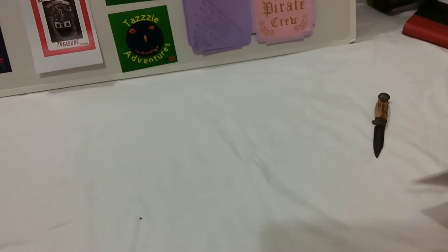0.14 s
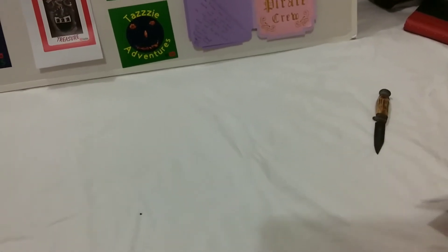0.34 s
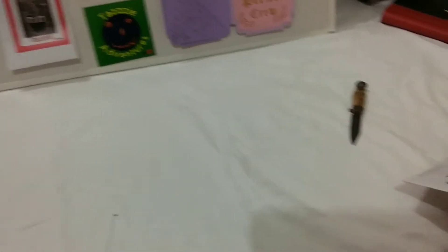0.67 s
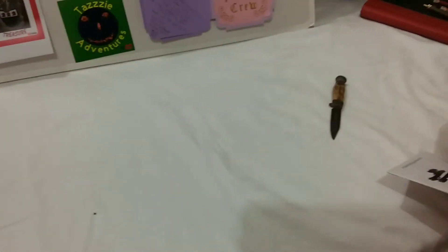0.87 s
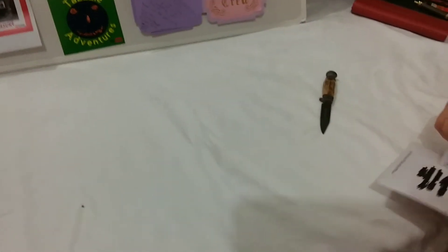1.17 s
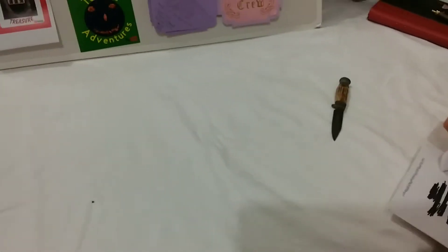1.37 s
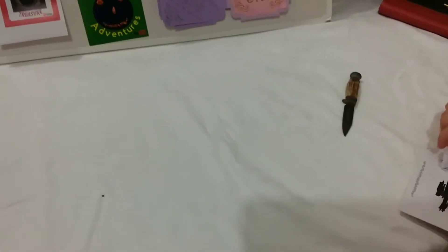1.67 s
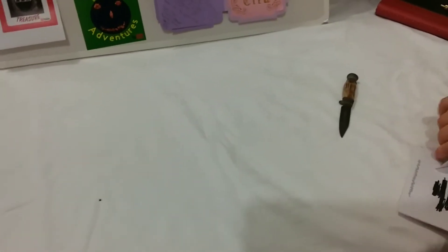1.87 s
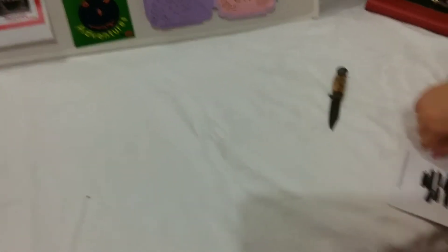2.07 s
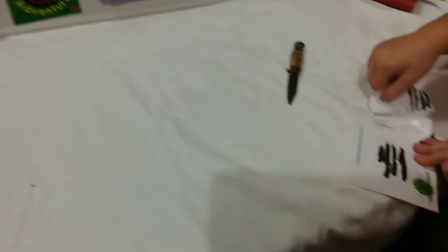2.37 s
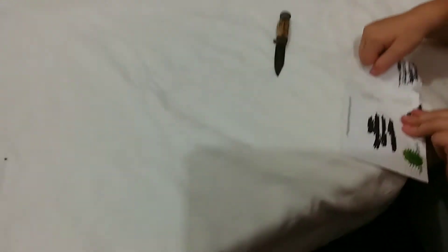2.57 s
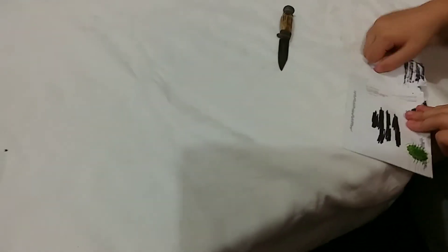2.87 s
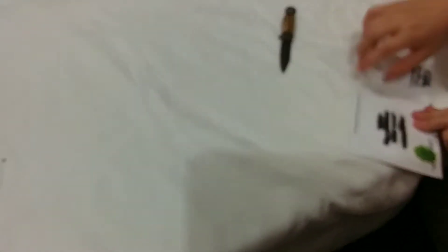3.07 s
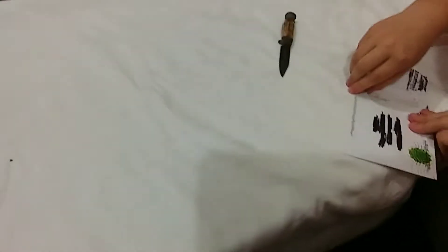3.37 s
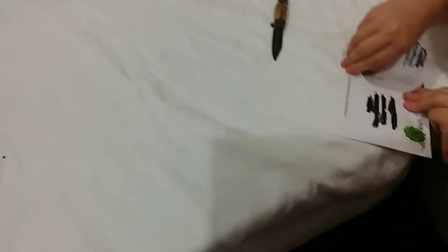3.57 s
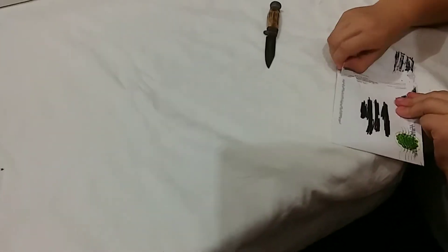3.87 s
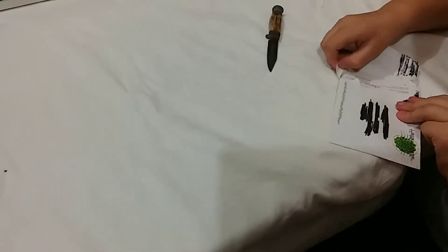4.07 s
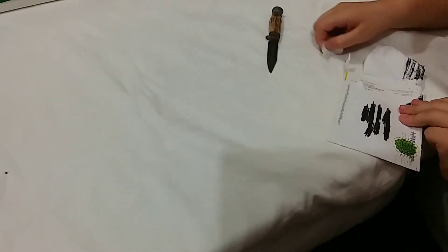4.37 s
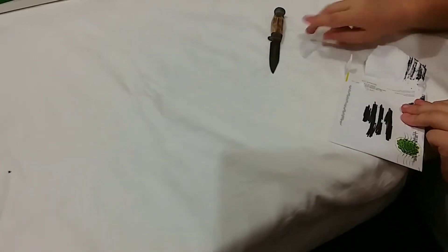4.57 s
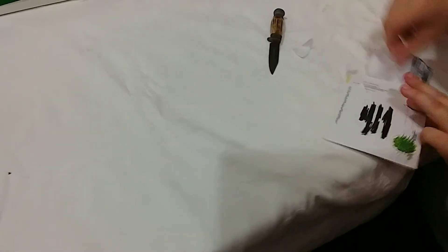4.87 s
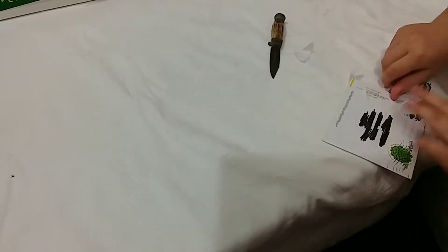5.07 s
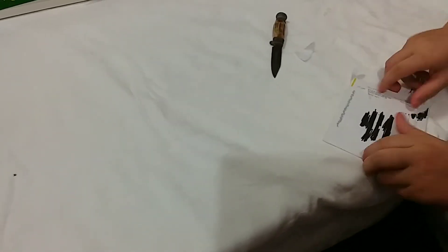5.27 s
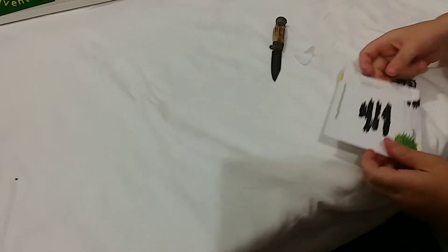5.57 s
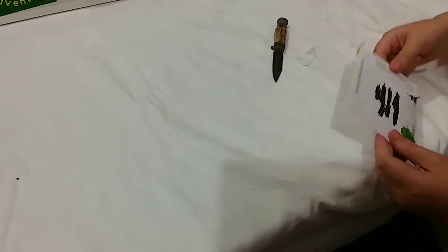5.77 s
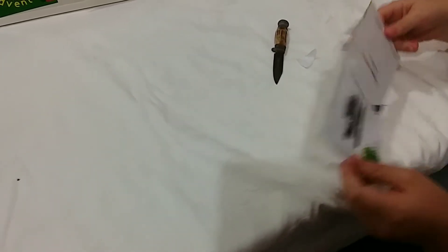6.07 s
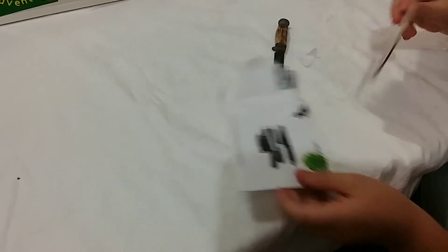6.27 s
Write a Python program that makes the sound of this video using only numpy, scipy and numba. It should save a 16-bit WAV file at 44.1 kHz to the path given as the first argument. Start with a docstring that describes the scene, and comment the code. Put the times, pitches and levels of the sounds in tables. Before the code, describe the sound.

Close, dry paper ripping in three goes in a quiet room, followed by soft buckling pops and light rustling as the envelope is handled.

```python
"""Faint pops and slides of paper come first, over a quiet room's rumble and hiss; then three goes of tearing.
An envelope is torn by hand on a cloth-covered table: fibres snap in clumps and ring sheet and flap.
Between and after the rips, patches buckle as struck modes plus a noise crack, and strokes slide as dense grains.
A fingertip clicks, knocks and judders; soft table bumps and fine crease ticks join in; a phone hears it close by."""
import sys
import numpy as np
from scipy import signal
from scipy.fft import rfft, irfft
from scipy.io import wavfile
from scipy.ndimage import uniform_filter1d
from numba import njit

SR = 44100
rng = np.random.default_rng(int(sys.argv[2]) if len(sys.argv) > 2 else 0)


def output_pcm(signal):
    """Save a mono or channel-first signal as 16-bit PCM at the path in sys.argv[1].

    Samples are clipped to [-1, 1] before scaling.
    """
    pcm = np.clip(np.atleast_2d(signal).T, -1, 1) * 32767
    wavfile.write(sys.argv[1], SR, np.round(pcm).astype(np.int16))


N = 283563
T_S = np.arange(N) / SR
TOP_HZ = 16000  # upper edge of the pickup

# Tables: levels are nominal, before the mix trims and filters in the functions.
# pulls: t/s, move to second level/s, fade/s, first level/dB, second level/dB, fizz/dB, flap/dB, sheet f/Hz,
# flap f/Hz, sheet bandwidth/f, coarse-fibre share (0-1), top of the fizz/dB
PULLS = [(0.909, 0.021, .12, -48.5, -44.5, 9.5, -13, 1950, 1100, .3, .8, -5),
         (0.991, 0.1, 0.049, -40.5, -41.5, 8, -7.5, 2000, 1040, .6, 0.8, -2.5),
         (1.135, 0.03, 0.043, -42, -37, 9.5, -6.5, 1850, 910, .6, 0.6, -7),
         (1.176, 0.12, 0.07, -44.5, -34.5, 8, -4.5, 1750, 860, .7, 0.6, -3),
         (1.305, 0.042, 0.046, -36.5, -31, 6, -5.5, 1850, 855, 1.1, 0.1, -10),
         (1.370, .01, 0.12, -48, -46.5, 3, -7, 1900, 850, .9, .5, -2),
         (1.462, .042, 0.036, -44, -26, 1, -8.5, 2080, 790, .45, .2, -1),
         (2.195, 0.12, .07, -38, -31, -0.5, -6, 1640, 1000, .22, .5, 1),
         (2.318, 0.027, .1, -32.5, -25.5, -0.5, -14.5, 2120, 763, .33, 0.4, 0.5),
         (2.385, 0.039, 0.17, -41, -41.5, 7.5, 0.5, 1800, 600, .9, .55, 3),
         (2.470, 0.1, .07, -40.5, -42, 0.5, -6, 1280, 630, .45, 0.5, 0.5),
         (3.764, 0.056, 0.11, -42, -35, 7, -3.5, 1850, 1060, .6, 0.7, -2),
         (3.935, .016, 0.22, -50.5, -49, 5, -6.5, 1780, 1000, .6, .35, 1),
         (4.020, 0.009, 0.11, -53.5, -51.5, 5.5, -3.5, 1810, 1000, .6, 0.6, 0),
         (4.182, 0.053, .07, -40.5, -32.5, 7, -3, 1580, 1150, .55, .08, 7),
         (4.262, 0.02, 0.034, -41.5, -39.5, 3.5, 1, 1680, 1050, .6, .12, -0.5)]
# sharp snaps (fibre bundles giving way; near 2.9 s a fingertip's stick-slip clicks):
# t/s, peak level/dB, treble/dB, 60 dB fade/ms
SNAPS = [(0.895, -24.5, 8, 5), (0.912, -22, 12, 8), (0.917, -19, 6, 10), (0.929, -17.5, 8, 18),
         (0.977, -23, 2, 12), (0.996, -14, 6, 42), (1.045, -9.5, -9, 26), (1.084, -9, 2, 14),
         (1.142, -15, 1, 18), (1.158, -21, 4, 40), (1.216, -15, 0, 8), (1.251, -18.5, 1, 4),
         (1.339, -16.5, -13, 30), (1.463, -16.5, -4, 23), (1.494, -12, -3, 6), (1.5, -10.5, -8, 9),
         (2.196, -16, -1, 16), (2.234, -16, -6, 17), (2.296, -22, 2, 13), (2.338, -15, -11, 8),
         (2.368, -14, -13, 19), (2.382, -17, -2, 18), (2.393, -18.5, 12, 15.5), (2.452, -19.5, -12, 26),
         (2.525, -19, 0, 20), (2.886, -32, -7, 5), (2.892, -33.5, -2, 11), (2.941, -37, 3, 8),
         (3.771, -9.5, 8, 23), (3.805, -10.5, 7, 5), (3.82, -10.5, 4.5, 8.5), (3.829, -14, -4, 11),
         (3.948, -17, 6.5, 30), (4.024, -21.5, 0, 32), (4.053, -27, 0, 8), (4.099, -31.5, 8, 11),
         (4.16, -29, 7, 3), (4.183, -14.5, -5, 21), (4.233, -14, -9, 38), (4.272, -17.5, 6, 25)]
# buckling patches: t/s, peak level/dB, ring f/Hz, crack level re pop/dB
POPS = [(0.065, -48, 613, 0.5), (0.156, -38, 1010, 4.5), (0.331, -49, 910, -6), (0.422, -49, 2400, 1),
        (1.427, -39.5, 820, 3), (1.748, -38.5, 860, -1.5), (1.95, -35.5, 2480, -0.5),
        (2.149, -33, 1620, -10), (2.382, -16.5, 2400, -21), (2.591, -25, 945, -7), (2.702, -47, 2310, -2),
        (2.881, -40, 1160, 0), (2.927, -39, 1600, -12.5), (4.099, -39, 1650, -12), (4.53, -45, 3400, -2),
        (4.757, -49.5, 1800, 1), (4.93, -45.5, 1990, 3.5), (5.513, -29.5, 2390, -6), (5.625, -38, 1180, -7),
        (5.631, -39.5, 1080, -6.5), (5.721, -26, 1840, -12.5), (5.912, -35, 1144, -1),
        (6.028, -38.5, 716, -5), (6.139, -43, 970, -6), (6.181, -44.5, 1260, -2), (6.369, -46, 1090, 1)]
# paper slides on paper and cloth: t/s, length/s, rustle/dB, hiss/dB, crinkle/dB
STROKES = [(0.085, 0.034, -54, -59.5, -74), (0.478, 0.12, -60.5, -59.5, -66),
           (0.595, .11, -61.5, -58.5, -80), (0.785, 0.1, -63, -63.5, -66), (1.639, 0.15, -52, -55.5, -61),
           (1.77, 0.24, -63, -69, -68), (2.868, 0.13, -52, -56, -52), (3.578, 0.13, -62, -61.5, -51.5),
           (4.09, 0.082, -83, -74, -60), (4.30, 0.14, -71, -70, -60.5), (4.831, 0.16, -54.5, -60.5, -65),
           (4.964, 0.35, -65, -66.5, -77), (5.282, 0.063, -58, -61.5, -74), (5.436, 0.1, -59.5, -58, -68),
           (5.628, 0.13, -57.5, -62.5, -71), (5.824, 0.2, -53.5, -49.5, -53),
           (5.971, 0.22, -58.5, -54, -56), (6.249, 0.18, -72, -65.5, -65)]
# restless held paper between strokes: rustle/dB, hiss/dB, crinkle/dB
FIDGET_DB = (-76, -90, -77)
# fine creases ticking: t/s, peak level/dB, f/Hz
TICKS = [(2.171, -44, 7500), (3.661, -37.5, 6040), (4.869, -40, 5460), (4.875, -19, 4700),
         (4.8853, -44, 4500)]
# finger knock on the pressed sheet: t/s, peak level/dB, ring f/Hz
KNOCK = (3.6335, -18, 1537)
# soft bumps on the table: t/s, peak level/dB, ring f/Hz
BUMPS = [(2.893, -38, 158), (3.272, -54, 80.6), (3.419, -52.5, 84.5), (4.22, -46.5, 82),
         (5.258, -37, 127.4), (5.271, -37.5, 83), (5.306, -43, 105)]
# modes of a buckling patch: multiple of its pitch, level/dB, 60 dB fade/cycles
PATCH_MODES = [(.54, 0, 10), (.74, -3, 25.5), (1, 6, 27), (1.3, 7.5, 10), (1.8, 4.5, 8.5)]
# modes of the knock: multiple of its pitch, level/dB, 60 dB fade/cycles
KNOCK_MODES = [(.54, -5, 11), (.66, -9, 9), (1, -3, 20), (1.75, -10, 18), (2.3, -14, 22)]
# modes of the padded table: multiple of its pitch, level/dB, 60 dB fade/cycles
TABLE_MODES = [(1, 12, 19.5), (1.45, 1, 20), (2.1, 6.5, 23.5)]
# spectrum of the taut sheet's drive: f/Hz, level/dB
SHEET_SPECTRUM = [(300, -41), (900, -13.5), (1400, 1.5), (2500, 3), (3300, -4), (5000, -29.5)]
# spectrum of bright fibre fizz and friction hiss: f/Hz, level/dB
FIZZ_SPECTRUM = [(300, -51), (1200, -23.5), (2600, -14), (3500, 2), (6000, 1), (8000, 1), (10000, -5),
                 (13000, -3.5), (16000, -11)]
# spectrum of the loose flap's drive: f/Hz, level/dB
FLAP_SPECTRUM = [(120, 2), (300, 4), (450, -5), (650, 2.5), (1150, -1), (1700, -3.5), (3500, -25)]
# spectrum of a sharp snap: f/Hz, level/dB
CRACK_SPECTRUM = [(100, 0.5), (400, -13.5), (800, -4.5), (2000, 3), (3000, 1), (6000, -8.5), (10000, -17),
                  (16000, -15)]
# spectrum of a buckling crack: f/Hz, level/dB
BUCKLE_SPECTRUM = [(100, -28), (450, -4.5), (900, 2), (1800, 3), (3500, 2), (7000, -7.5), (15000, -22)]
# spectrum of sliding rustle and shivering sheet: f/Hz, level/dB
RUSTLE_SPECTRUM = [(60, -33.5), (230, -10), (800, -2.5), (1900, -1), (3000, -5), (6000, -47.5)]
# spectrum of crinkling creases: f/Hz, level/dB
CRINKLE_SPECTRUM = [(200, -11), (800, -4.5), (1800, 2.5), (3500, -4.5), (7500, -1), (11000, -1.5),
                    (16000, -8.5)]
# spectrum of the quiet room: f/Hz, level/dB
QUIET_SPECTRUM = [(25, -16), (59, -7.5), (107, -3.5), (178, -6), (253, -10), (450, -12), (1450, -17),
                  (5280, -26), (8200, -30.5), (15500, -27.5)]
# left-right spread of the treble: t/s, side gain/dB
SPREAD = [(1.1, -10), (2.3, -44), (3.8, -24), (4.05, -5.5), (4.22, -41), (4.9, -19.5), (5.8, -44)]

# a pull drops FADE_DB over its fade time; its colours hold at ring level EASY_DB
FADE_DB, EASY_DB = 27, -39
# per dB of harder pull: sheet pitch rise, and fizz and flap growth (below 1: the sheet takes over)
TIGHTEN_OCT_PER_DB, FIZZ_DB_PER_DB, FLAP_DB_PER_DB = 0.018, 0.83, 0.89
LEAD_S = .02  # creaking ahead of a burst
# a pop's crack is low-passed at this multiple of its ring, at most CRACK_TOP_HZ
CRACK_REACH, CRACK_TOP_HZ = 3.5, 4600
# sheet shiver after a pop: level re pop, 60 dB fade, grain rate
SHIVER_DB, SHIVER_T60_S, SHIVER_PER_S = -17, 0.27, 900
# fingertip judder: start, rise, rms level at the end of the rise, then fade rate
JUDDER_S, JUDDER_RISE_S, JUDDER_DB, JUDDER_FADE_DB_PER_S = 3.705, 0.027, -36.5, 160
# slip rate: first, last, time between
JUDDER_HZ, JUDDER_FAST_HZ, JUDDER_SPEEDUP_S = 194, 204.3, .07
QUIET_DB = -65.5  # mean rms level of the room


def rips(flap_width=0.41, shimmer_db=3.5, full_per_s=2600, full_db=-30, rate_power=.9, wander_db=0.87,
         top_hz=12500, top_width=.45):
    """The running tear drives the taut sheet, the loose flap and a bright fizz at its tip."""
    sheet, fizz, flap = np.zeros((3, N))
    # at rest the sheet keeps the tuning of the first pull
    tuning = np.tile(np.array(PULLS[0][7:], float), (N, 1))
    for gain, (fizz_db, flap_db, *tone) in pulling():
        force = np.abs(gain) / undb(EASY_DB)
        # the strongest pull sets resonances and grain
        tuning[force > sheet] = tone
        sheet = np.maximum(sheet, force)
        fizz = np.maximum(fizz, undb(fizz_db) * force ** FIZZ_DB_PER_DB)
        flap = np.maximum(flap, undb(flap_db) * force ** FLAP_DB_PER_DB)
    sheet_hz, flap_hz, width, coarse_share, top_db = tuning.T
    force_db = 20 * np.log10(np.maximum(sheet, .5))
    sheet_hz = sheet_hz * 2 ** (TIGHTEN_OCT_PER_DB * force_db)

    # a slow tear breaks into single snaps, a fast one runs together
    snaps_per_s = 300 + full_per_s * (sheet * undb(EASY_DB - full_db)) ** rate_power
    coarse = crackle(snaps_per_s, spread_db=4.0, clump_db=1.8, clump_hz=270, ring_s=0.005, ring_share=.8)
    fine = crackle(9000, spread_db=2.8, clump_db=2.1, clump_hz=330, ring_s=0.0065, ring_share=1.1)
    fibres = np.sqrt(coarse_share) * coarse + np.sqrt(1 - coarse_share) * fine

    taut_hz = sheet_hz * undb(wander_db * walk(45))
    taut = resonance(colour(fibres, SHEET_SPECTRUM), taut_hz, width) / np.sqrt(width)
    loose_hz = flap_hz * undb(wander_db * walk(30))
    loose = resonance(colour(fibres, FLAP_SPECTRUM), loose_hz, flap_width)

    # the bending paper beams each part of the treble a different way from moment to moment
    beams = np.zeros(N)
    for hz in (3900, 5670, 8860, 11500):
        shimmer = undb(shimmer_db * walk(60))
        beams += shimmer * resonance(fibres, hz * undb(0.17 * walk(20)), 0.56)
    tip = unit(colour(beams, FIZZ_SPECTRUM))
    tip = tip + (undb(top_db) - 1) * resonance(tip, top_hz, top_width)
    mix = sheet * unit(taut) + undb(-3) * fizz * tip + undb(-1.42) * flap * unit(loose)
    return undb(EASY_DB) * mix


def pulling():
    """Each pull starts at once, moves up or slightly down to its second level, then fades; yields gain, tone."""
    for start_s, move_s, fade_s, first_db, second_db, *tone in PULLS:
        times_s = start_s + np.cumsum([0, move_s, fade_s])
        yield gain_curve(times_s, [first_db, second_db, second_db - FADE_DB]), tone


def stalls(depth=0.22, hold_s=0.021):
    """Something catches before each sharp snap: the gain of the tear dips, deepest just ahead of it."""
    caught = np.zeros(N)
    for s, *_ in SNAPS:
        add(caught, s - 0.76 * hold_s, np.hanning(int(hold_s * SR)))
    return 1 - np.clip(depth * caught, 0, 1)


def crackle(per_s, spread_db, clump_db, clump_hz, ring_s, ring_share):
    """Clicks come in clumps, a few much louder than the rest, and ring the sheet."""
    size_db = spread_db * np.minimum(rng.exponential(size=N), 4)
    struck = rng.random(N) < per_s / SR
    clicks = struck * rng.choice([-1, 1], N) * undb(size_db + clump_db * walk(clump_hz))
    out = clicks + ring_share * on_sheet(clicks, ring_s)
    # the hand feeds in energy steadily, however it is shared among the clicks
    power = np.abs(uniform_filter1d(out ** 2, size=1000))
    return out / np.sqrt(power + 1e-9)


def on_sheet(clicks, ring_s, count=5):
    """Clicks land at several places on the sheet, each with its own brief ring."""
    place = rng.integers(count, size=N)
    return sum(signal.oaconvolve(clicks * (place == k), burst(ring_s, .02))[:N] for k in range(count))


def snaps(tick=0.42, gain_db=-2, rise_s=.0015, low_hz=420):
    """Fibre bundles, or near 2.9 s a sticking fingertip, strain, then let go with a tick and a noise burst."""
    out = np.zeros(N)
    for s, db, treble_db, fade_ms in SNAPS:
        run = give_way(fade_ms / 1000, lead_s=0.0022, lead_db=-17)
        run[int(LEAD_S * SR)] += tick
        crack = colour(run, CRACK_SPECTRUM) + undb(treble_db - 2.5) * colour(run, FIZZ_SPECTRUM)
        add(out, s + rise_s - LEAD_S, undb(db + gain_db) * peak_1(crack))
    # a snap is too small to push out any bass
    return signal.sosfilt(signal.butter(2, low_hz, "high", fs=SR, output="sos"), out)


def give_way(t60_s, lead_s, lead_db):
    """Growing creaks lead into a burst, which starts after LEAD_S."""
    t = np.arange(-int(LEAD_S * SR), 0) / SR
    main = burst(t60_s, 0.055)
    creak = rng.standard_normal(len(t)) * np.exp(t / lead_s) * undb(lead_db) * np.abs(main).max()
    return np.r_[creak, main]


def pops(t60_s=0.031, gain_db=-1.5, low_hz=380, settle_s=0.0025, settle_db=-9.0, settle_count=3):
    """A patch of paper flips over and settles: its modes ring, the highest dying soonest."""
    out = np.zeros(N)
    for s, db, hz, crack_db in POPS:
        crack = colour(give_way(t60_s, lead_s=.0022, lead_db=-15), BUCKLE_SPECTRUM)
        dull_hz = min(CRACK_REACH * hz, CRACK_TOP_HZ)
        crack = signal.sosfilt(signal.butter(3, dull_hz, fs=SR, output="sos"), crack)
        add(out, s - LEAD_S, undb(db + crack_db) * peak_1(crack))
        add(out, s, undb(db + gain_db) * ring(PATCH_MODES, hz, jitter=0.034))
        # neighbouring creases follow, progressively weaker, each at its own delay and pitch
        for k in range(1, settle_count + 1):
            delay_s = settle_s * k ** 2 * rng.uniform(0.44, 1.5)
            add(out, s + delay_s, undb(db + k * settle_db) * ring(PATCH_MODES, hz, jitter=0.15))
        # the sheet shivers on in scattered grains
        shiver = burst(SHIVER_T60_S, .2)
        grains = shiver * (rng.random(len(shiver)) < SHIVER_PER_S / SR)
        add(out, s, undb(db + SHIVER_DB) * peak_1(colour(grains, RUSTLE_SPECTRUM)))
    # a small patch radiates hardly any bass
    return signal.sosfilt(signal.butter(2, low_hz, "high", fs=SR, output="sos"), out)


def sliding(crinkle_per_s=170, crinkle_spread_db=5, swell=0.59, fidget_db=3, waver_db=1.5):
    """Each stroke swells and fades: fine friction grains, with lone ticks from the creases."""
    grains = crackle(12000, spread_db=3.5, clump_db=2.0, clump_hz=140, ring_s=0.0031, ring_share=1.1)
    sizes = undb(crinkle_spread_db * np.minimum(rng.exponential(size=N), 2))
    creases = on_sheet((rng.random(N) < crinkle_per_s / SR) * sizes, ring_s=0.01, count=8)
    # held paper never lies quite still
    rustle, hiss, crinkle = undb(FIDGET_DB)[:, None] * undb(fidget_db * walk(9.6))
    for start_s, length_s, *levels_db in STROKES:
        envelope = np.abs(np.sin(np.linspace(0, np.pi, int(length_s * SR)))) ** swell
        for gain, db in zip((rustle, hiss, crinkle), levels_db):
            add(gain, start_s, undb(db) * envelope)
    out = undb(-4.5 + waver_db * walk(45)) * rustle * unit(colour(grains, RUSTLE_SPECTRUM))
    out += undb(-3.5) * hiss * unit(colour(grains, FIZZ_SPECTRUM))
    out += undb(-4.0) * crinkle * unit(colour(creases, CRINKLE_SPECTRUM))
    return out


def ticks(width=1.1, ring_share=.45, t60_s=0.009, body_db=-17):
    """A tiny crease flicks over: one thin, bright click that barely stirs the sheet."""
    out = np.zeros(N)
    for s, db, hz in TICKS:
        flick = ring_share * burst(t60_s, .03)
        flick[0] += 1
        click = resonance(resonance(flick, hz, width), hz, width)
        click = click + undb(body_db) * colour(flick, BUCKLE_SPECTRUM)
        add(out, s, undb(db) * peak_1(click))
    return out


def knock(low_hz=450, contact_hz=3500, press_s=0.0011):
    """One hollow knock of a soft fingertip on the table through the paper: modes with a softened onset."""
    out = np.zeros(N)
    s, db, hz = KNOCK
    tap = ring(KNOCK_MODES, hz, jitter=.01)
    tap = tap * (1 - np.exp(-np.arange(len(tap)) / SR / press_s))
    add(out, s, undb(db) * peak_1(tap))
    return signal.sosfilt(signal.butter(2, [low_hz, contact_hz], "band", fs=SR, output="sos"), out)


def judder(overtone_db=-28):
    """A dragged fingertip catches and slips ever faster: a nearly pure tone that dies away."""
    age_s = np.maximum(T_S - JUDDER_S, 0)
    slip_hz = np.interp(age_s, [0, JUDDER_SPEEDUP_S], [JUDDER_HZ, JUDDER_FAST_HZ])
    phase = 2 * np.pi * np.cumsum(slip_hz) / SR
    rise = np.minimum(age_s / JUDDER_RISE_S, 1) ** 2
    fade_db = JUDDER_FADE_DB_PER_S * np.maximum(age_s - JUDDER_RISE_S, 0)
    grip = rise * undb(JUDDER_DB - fade_db)
    return np.sqrt(2) * grip * (np.sin(phase) + undb(overtone_db) * np.sin(2 * phase))


def bumps():
    """Dull bumps: the padded table's modes, muffled by the tablecloth."""
    out = np.zeros(N)
    cloth = [(30, -16), (70, -3.5), (200, -8.5), (400, -16), (1500, -43)]
    for s, db, hz in BUMPS:
        add(out, s, undb(db) * colour(ring(TABLE_MODES, hz, jitter=0.012), cloth))
    return out


def room(x, t60_s=0.27, wet_db=-12, gap_s=.006):
    """Nearby walls return a short, slightly dull tail."""
    tail = colour(burst(t60_s, 0.42), [(100, 5.0), (700, 1.5), (6000, -2.5), (16000, -2.5)])
    delayed_tail = np.r_[np.zeros(int(gap_s * SR)), tail]
    return x + undb(wet_db) * signal.fftconvolve(x, delayed_tail)[:N]


def background():
    """Low room rumble and faint hiss: coloured noise with a slowly wandering level."""
    return undb(QUIET_DB + .5 * walk(4.38)) * unit(colour(rng.standard_normal(N), QUIET_SPECTRUM))


def undb(db):
    """Decibels to gain."""
    return 10 ** (np.asarray(db) / 20)


def unit(x):
    """Scale to rms 1."""
    return x / np.sqrt(np.mean(x ** 2))


def peak_1(x):
    """Scale to peak 1."""
    return x / np.abs(x).max()


def gain_curve(times_s, db):
    """Gain along a dB curve, silent outside it, edges smoothed."""
    gain, inside = np.zeros(N), (T_S >= times_s[0]) & (T_S <= times_s[-1])
    gain[inside] = undb(np.interp(T_S[inside], times_s, db))
    return uniform_filter1d(gain, size=160)


def add(track, s, sound):
    """Mix a sound in at time s."""
    start = max(int(s * SR), 0)
    track[start:start + len(sound)] += sound[:N - start]


def colour(x, spectrum):
    """Causal minimum-phase filter with the given (f/Hz, level/dB) shape, via the folded cepstrum."""
    size = 1024
    hz, db = np.transpose(spectrum)
    grid_hz = np.linspace(1, SR / 2, size + 1)
    cepstrum = irfft(np.log(undb(np.interp(np.log(grid_hz), np.log(hz), db))))
    cepstrum[1:size] *= 2
    cepstrum[size + 1:] = 0
    return signal.oaconvolve(x, irfft(np.exp(rfft(cepstrum))))[:len(x)]


def walk(rate_hz):
    """Random wander between rate_hz knots a second, spread near 1."""
    knots = rng.standard_normal(int(N / SR * rate_hz) + 2)
    return np.interp(T_S * rate_hz, np.arange(len(knots)), knots) * np.sqrt(3 / 2)


def burst(t60_s, length_s):
    """Noise that dies away, with unit energy."""
    t = np.arange(int(length_s * SR)) / SR
    noise = rng.standard_normal(len(t)) * np.exp(-np.log(1000) * t / t60_s)
    return noise / np.sqrt(np.sum(noise ** 2))


def ring(modes, hz, jitter):
    """Struck modes of alternating sign that fade after so many cycles; peak 1."""
    t = np.arange(SR // 4) / SR
    out = np.zeros(len(t))
    for k, (ratio, db, cycles) in enumerate(modes):
        mode_hz = min(hz * ratio * (1 + jitter * rng.standard_normal()), TOP_HZ)
        fade = np.exp(-np.log(1000) * mode_hz * t / cycles)
        out += (-1) ** k * undb(db) * np.sin(2 * np.pi * mode_hz * t) * fade
    return peak_1(out)


def resonance(x, hz, width):
    """Band-pass with a fixed or moving centre; width is a share of the centre."""
    return sweep(x, hz * np.ones(len(x)), width * np.ones(len(x)))


@njit
def sweep(x, hz, width):
    """State-variable band-pass, tuned anew at every sample."""
    y, band, low = np.empty(len(x)), 0., 0.
    for i in range(len(x)):
        g = np.tan(np.pi * hz[i] / SR)
        v = (band + g * (x[i] - low)) / (1 + g * (g + width[i]))
        band = 2 * v - band
        low = low + 2 * g * v
        y[i] = width[i] * v
    return y


def scene(hiss_side_db=-12):
    """All sources sit centrally; a decorrelated copy of the paper's treble, and faint hiss, widen left and right."""
    paper = room(rips() * stalls() + snaps() + pops() + knock() + sliding()) + ticks()
    mid = paper + judder() + bumps() + background()
    decorrelated = signal.fftconvolve(paper, burst(.006, .02))[:N]
    treble = colour(decorrelated, [(1000, -41.5), (2800, -64.5), (4800, -9.0), (8000, -5.5), (14000, 3.5)])
    side = undb(np.interp(T_S, *np.transpose(SPREAD))) * treble
    side += undb(hiss_side_db) * colour(background(), [(60, -20.5), (300, -10.5), (15000, -2.5)])
    return np.array([mid + side, mid - side])


def record(dry, port_hz=8100, port_q=6, port_gain=0.7):
    """The microphone port rings in the treble; the top is cut steeply."""
    port = signal.lfilter(*signal.iirpeak(port_hz, port_q, fs=SR), dry)
    steep_cut = signal.ellip(10, .2, 80, TOP_HZ, fs=SR, output="sos")
    return signal.sosfilt(steep_cut, dry + port_gain * port)


dry = scene()
out = record(dry)
output_pcm(out)
```